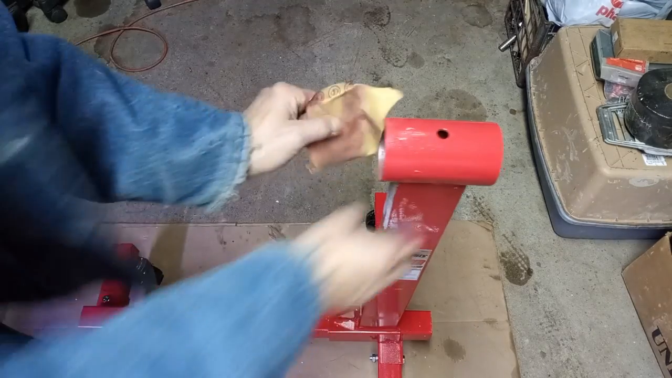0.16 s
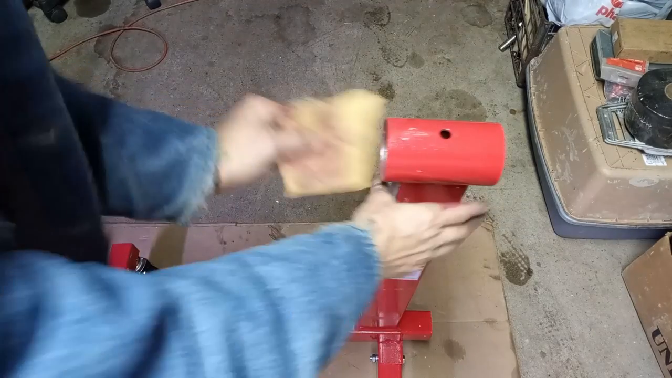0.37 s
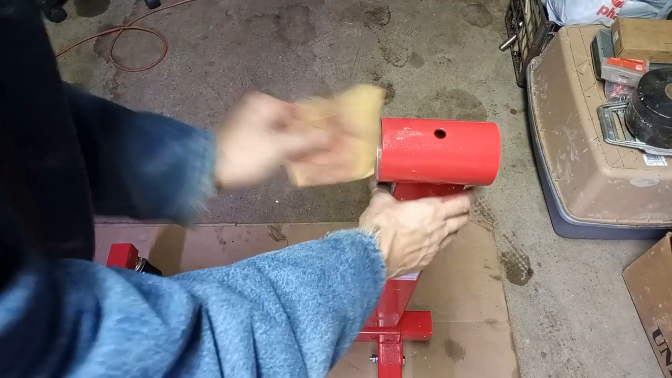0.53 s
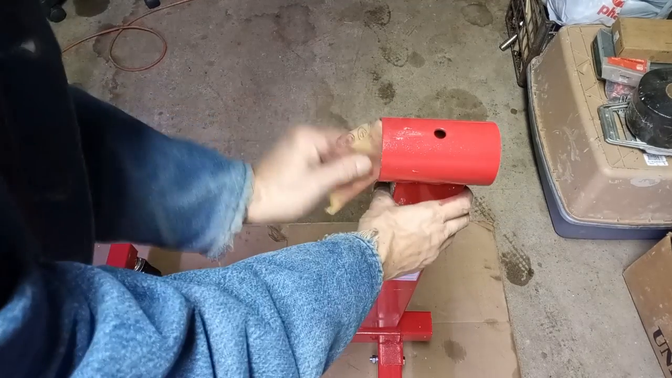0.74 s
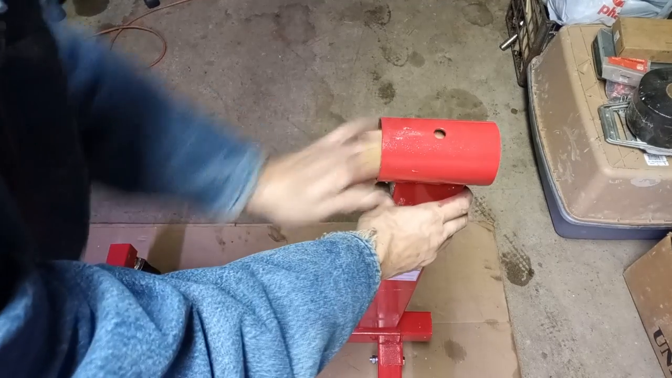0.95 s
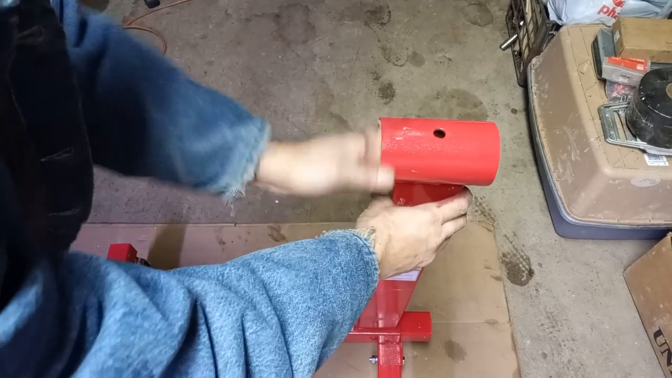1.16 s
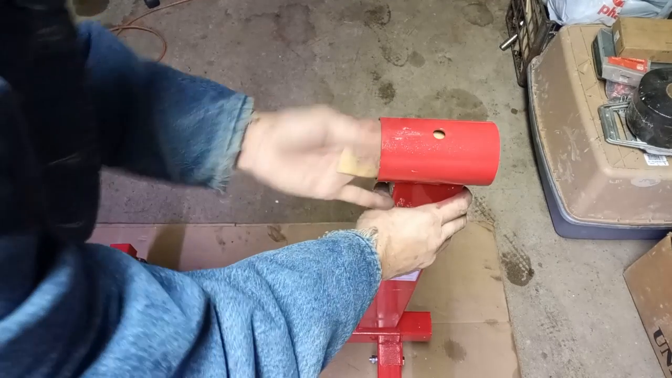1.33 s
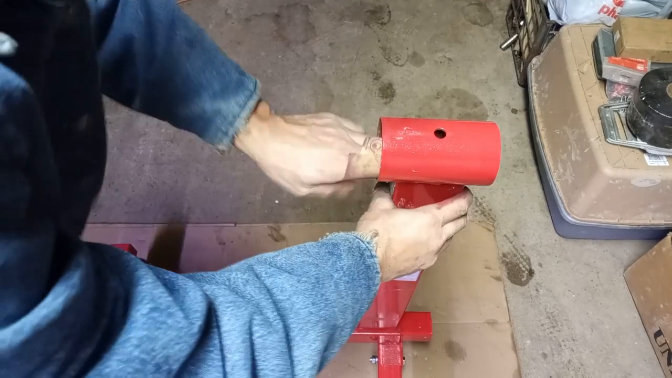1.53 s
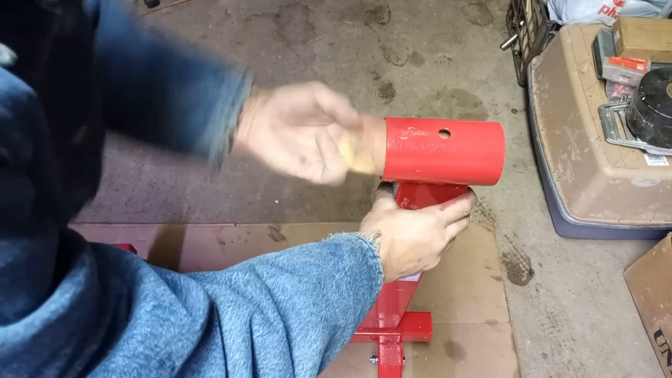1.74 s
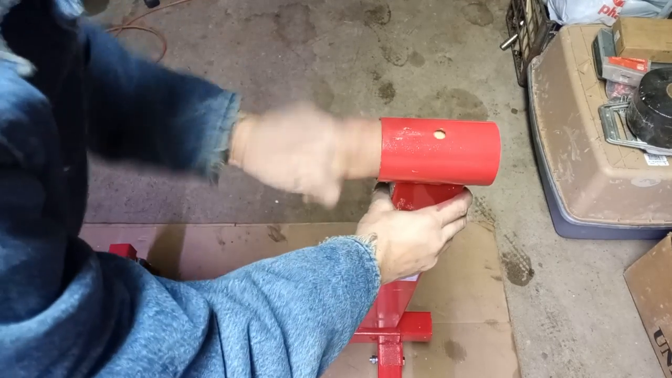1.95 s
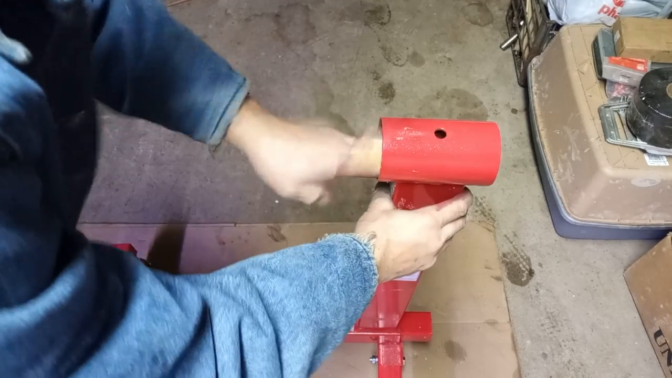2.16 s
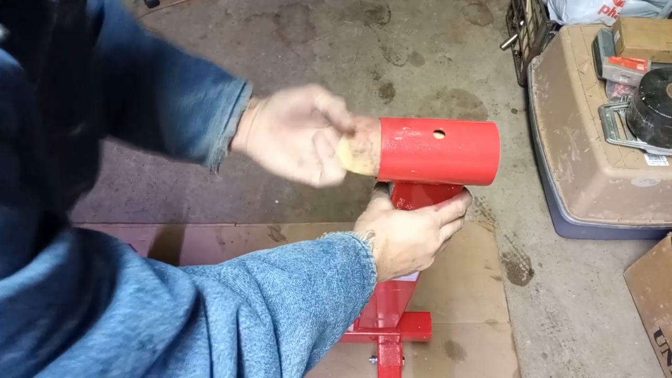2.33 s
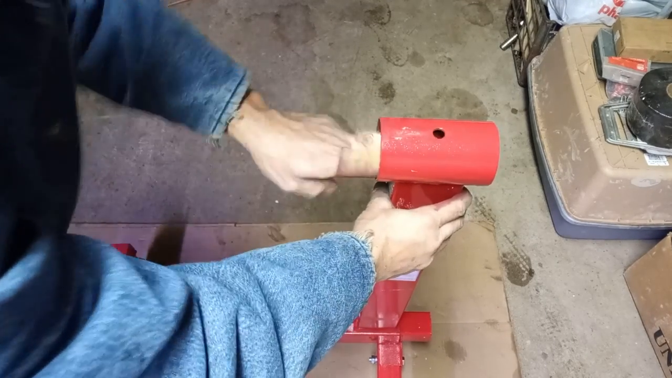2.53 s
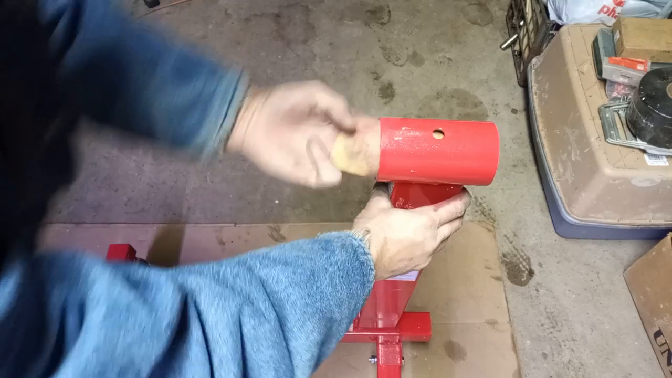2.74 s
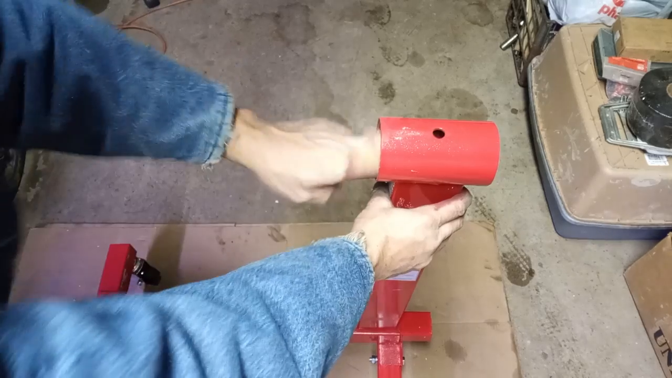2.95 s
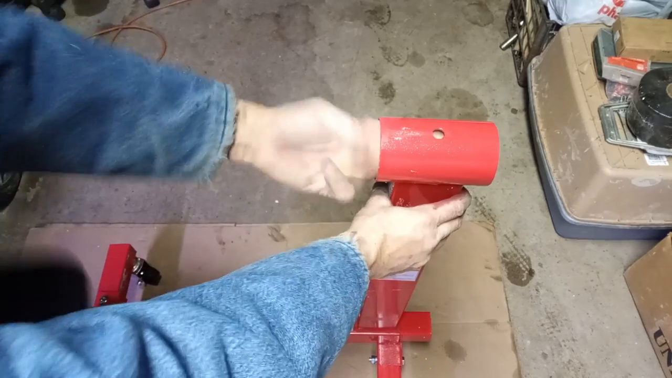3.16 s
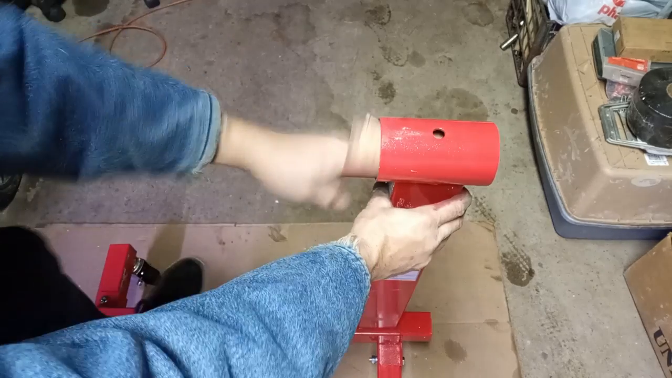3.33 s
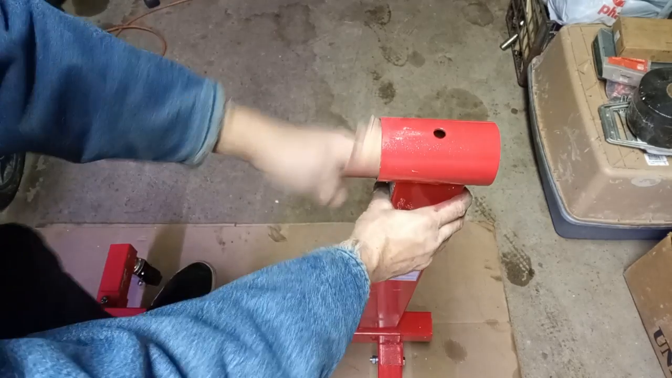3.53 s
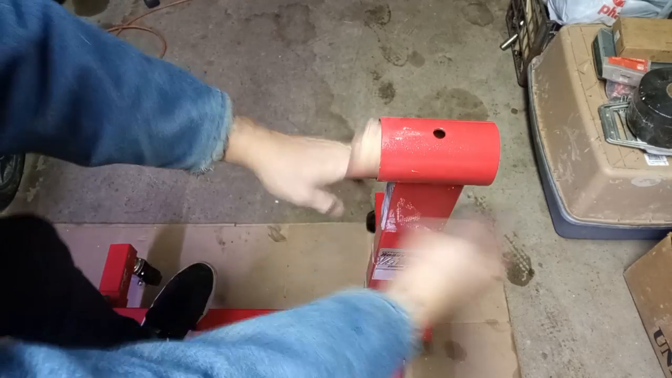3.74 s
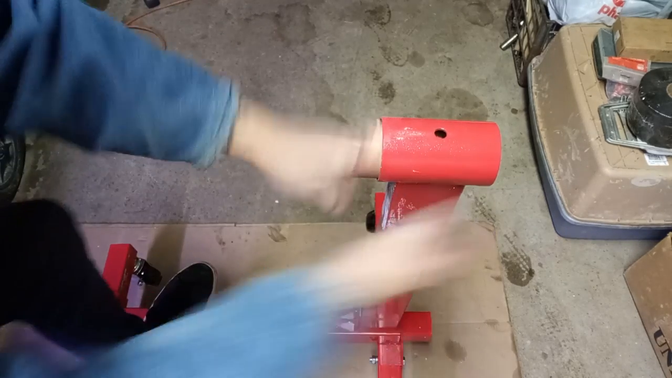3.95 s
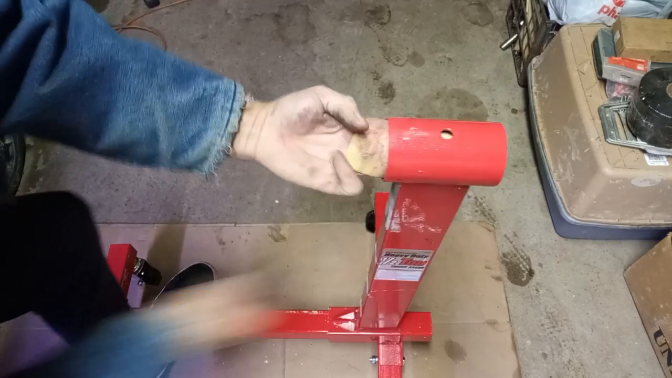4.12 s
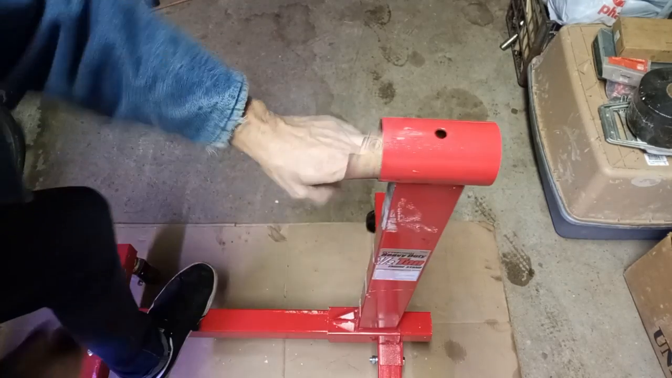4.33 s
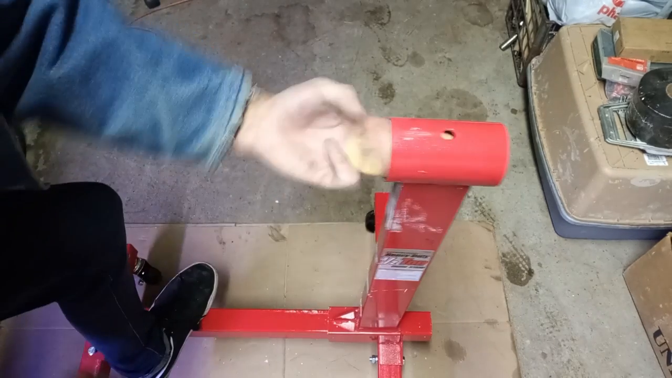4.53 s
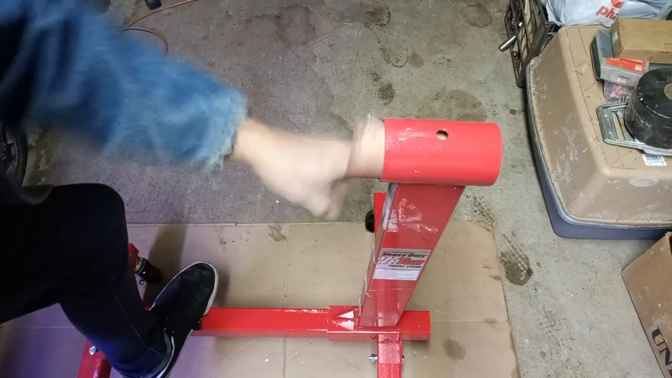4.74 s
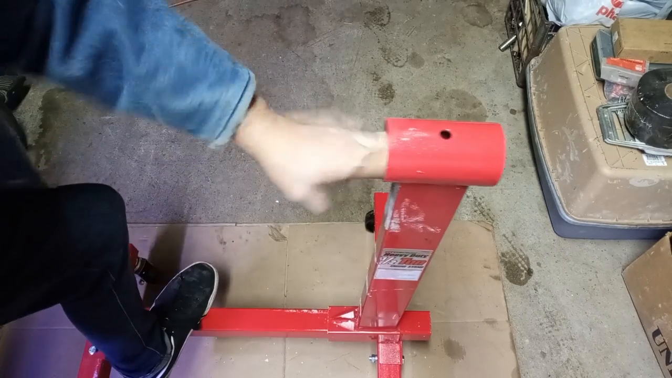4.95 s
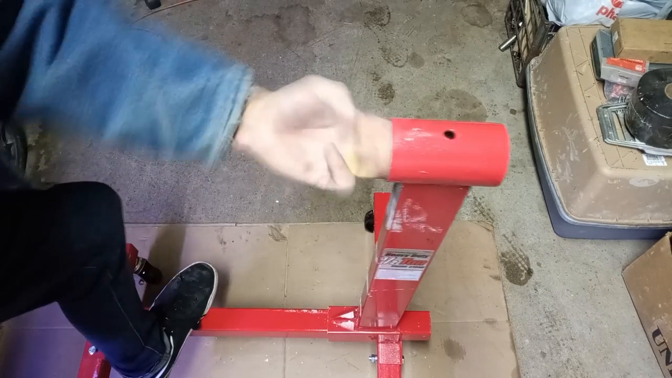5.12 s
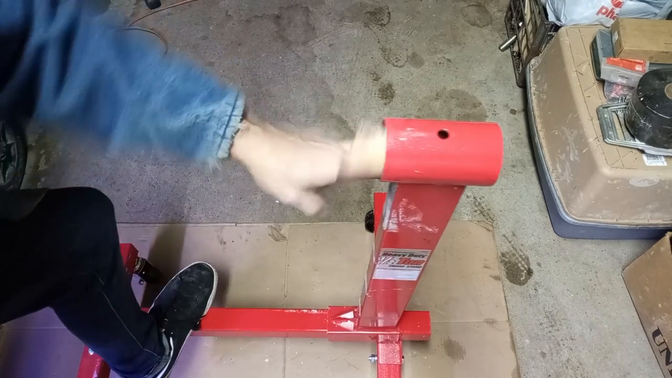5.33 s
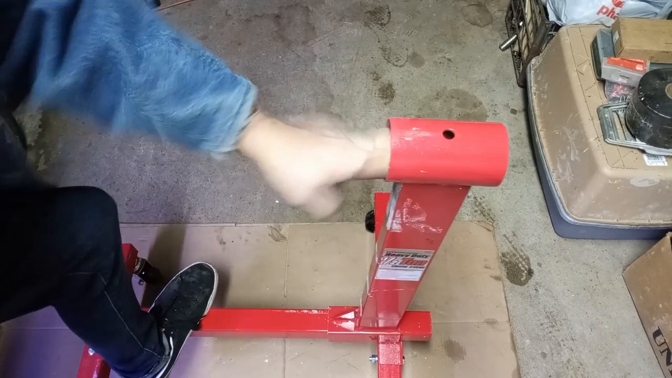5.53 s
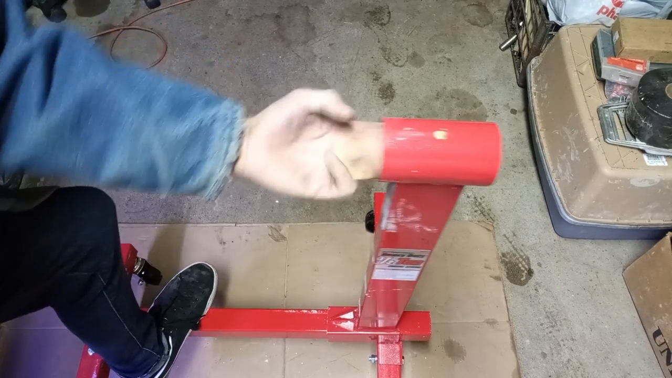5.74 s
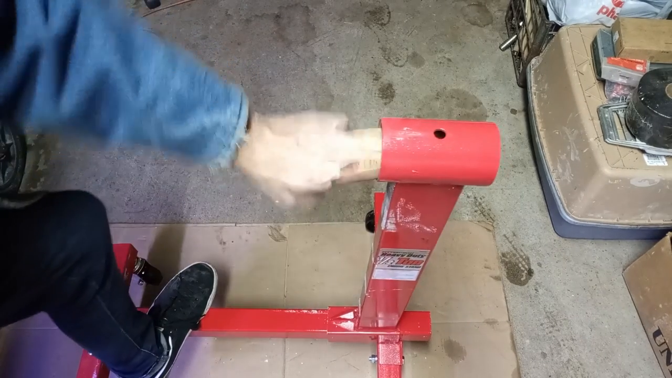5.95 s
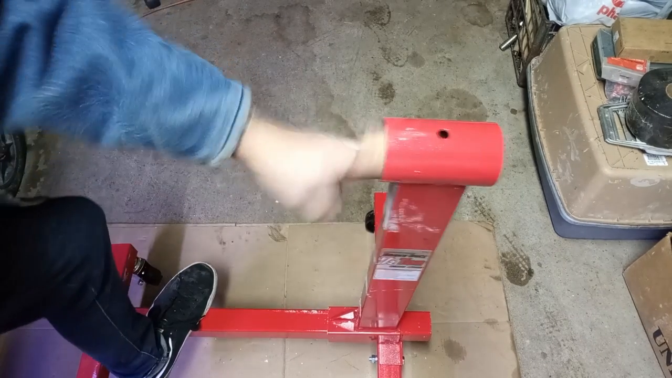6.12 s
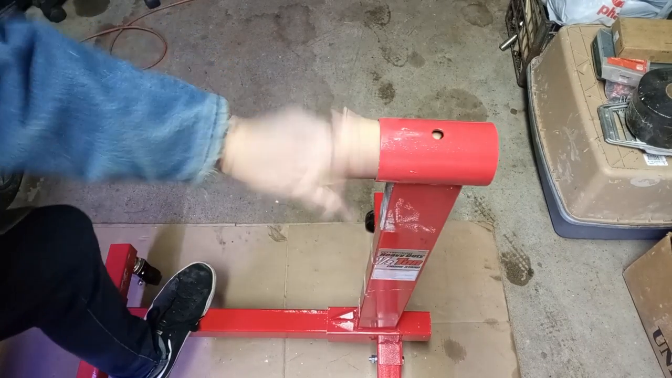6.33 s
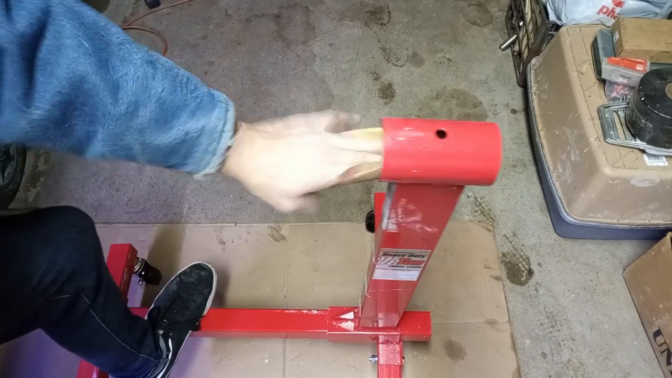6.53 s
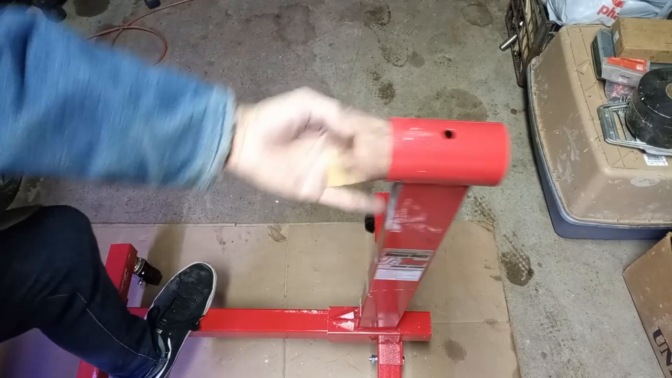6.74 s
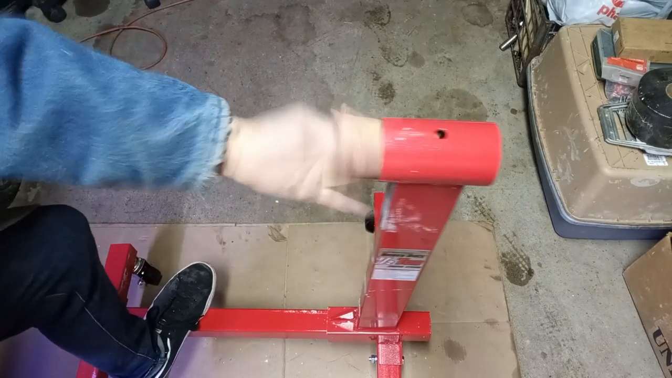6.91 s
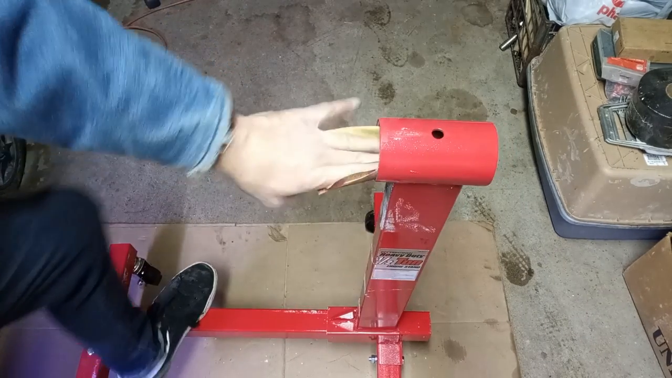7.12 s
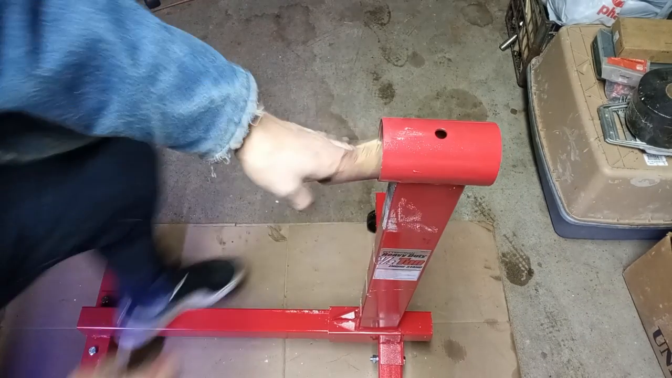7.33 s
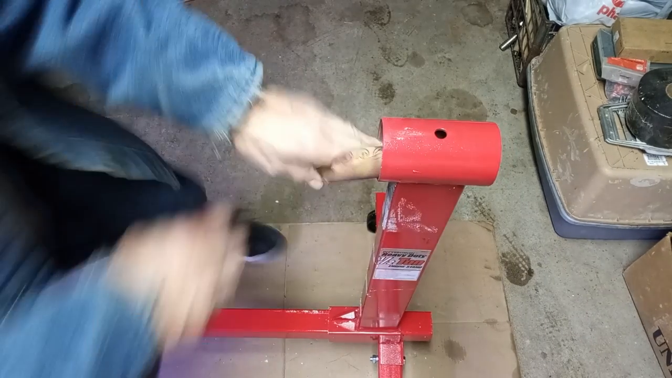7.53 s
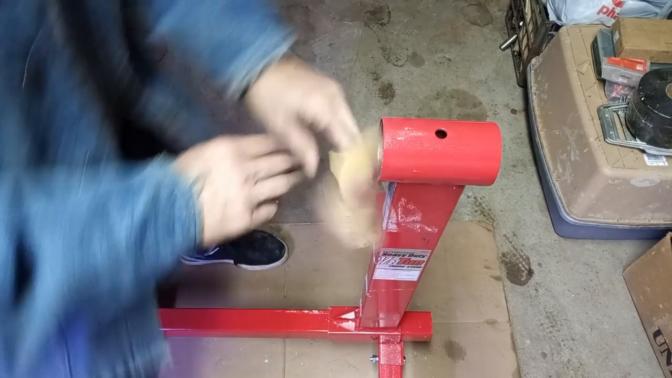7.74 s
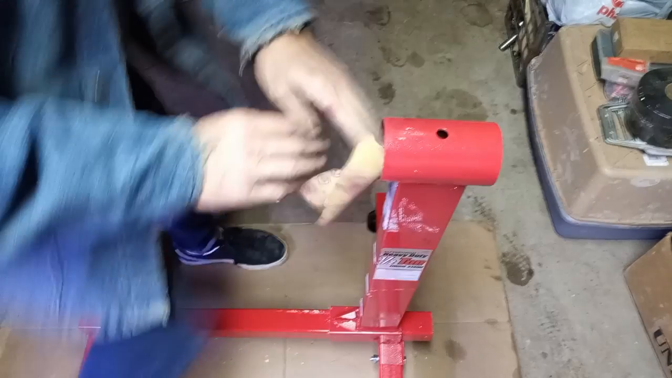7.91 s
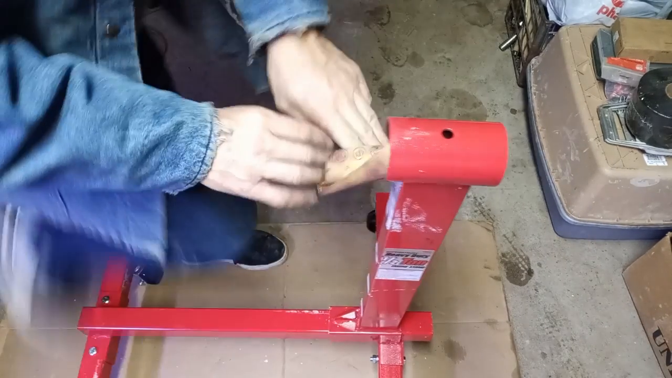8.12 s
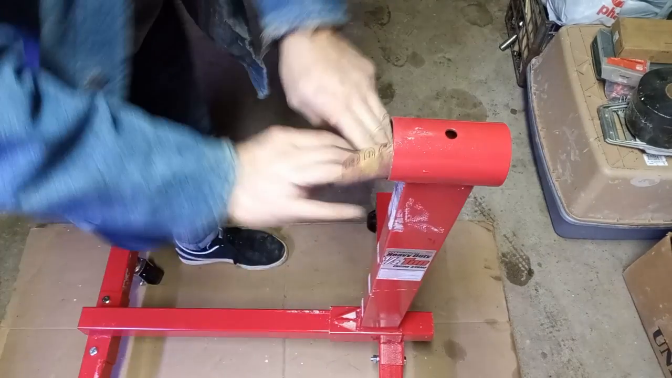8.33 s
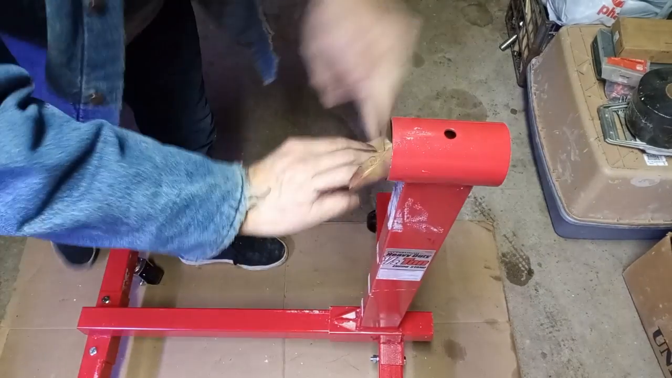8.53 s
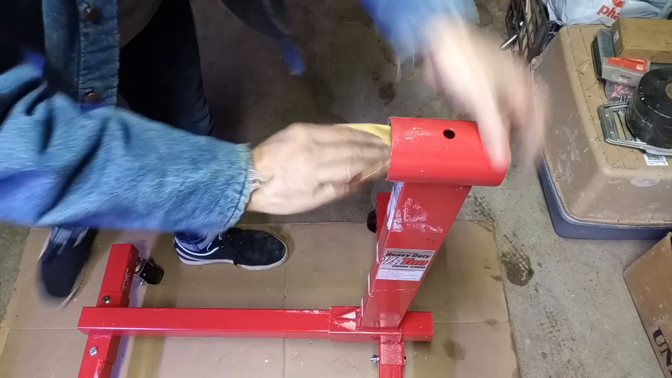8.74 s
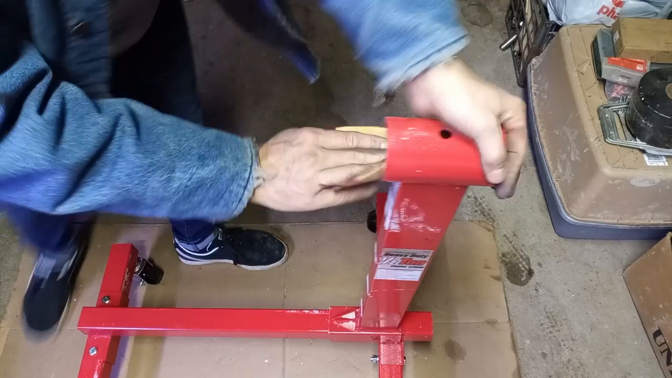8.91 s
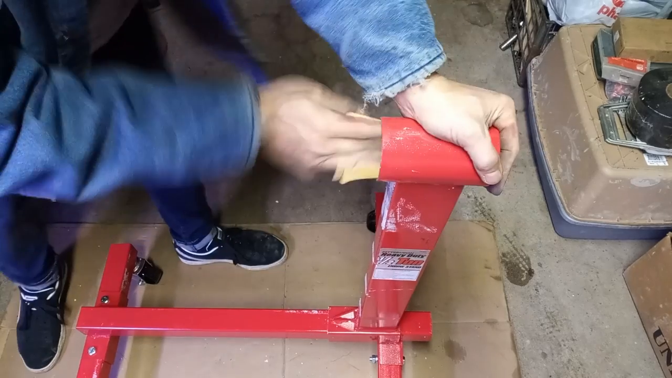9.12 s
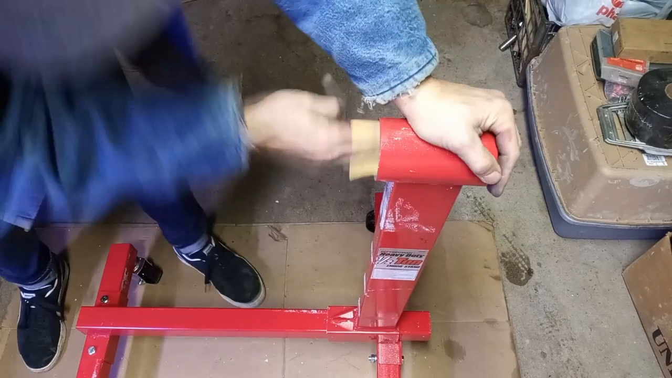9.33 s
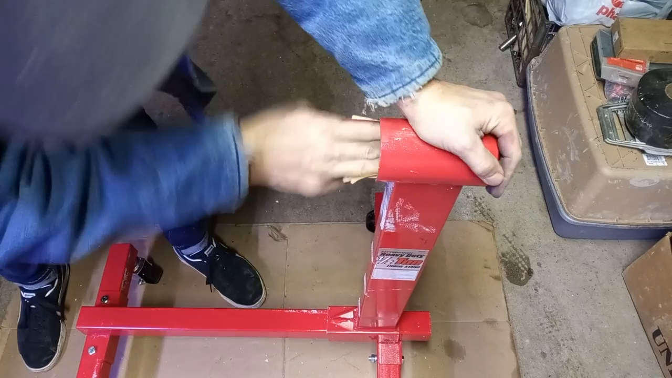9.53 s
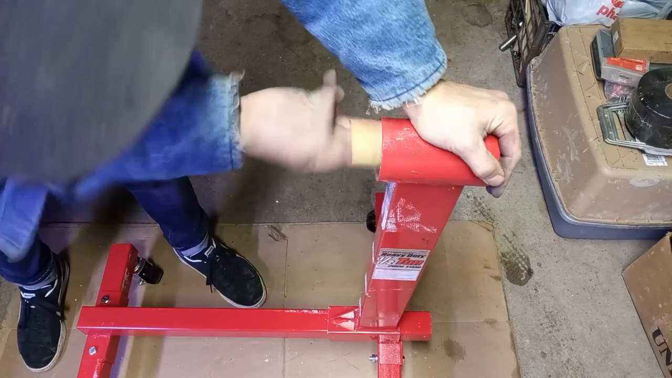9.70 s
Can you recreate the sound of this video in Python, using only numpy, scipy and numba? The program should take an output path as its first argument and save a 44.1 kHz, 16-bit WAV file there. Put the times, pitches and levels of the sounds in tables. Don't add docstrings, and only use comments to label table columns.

```python
import sys
import numpy as np
from scipy import signal
from scipy.fft import rfft, irfft, next_fast_len
from scipy.io import wavfile
from scipy.ndimage import uniform_filter1d
from numba import njit

SR = 44100
rng = np.random.default_rng(int(sys.argv[2]) if len(sys.argv) > 2 else 0)


def voltage_ratio(decibels):
    exponent = np.asarray(decibels, float) / 20
    return 10 ** exponent


def unload_audio(sound):
    columns = np.transpose(np.atleast_2d(sound))
    steps = np.round(np.clip(columns, -1, 1) * 32767)
    wavfile.write(sys.argv[1], SR, steps.astype(np.int16))


N = 435266

# frequency [Hz], density [dB per Hz].
AIR_SPECTRUM = [(18, -80), (30, -31), (118, -11), (437, -4), (1250, -2.5), (4080, -12), (6550, -40),
                (8080, -23), (16000, -28)]
AIR_DB = -56.5
GARAGE_T60_S, GARAGE_DB = 0.069, -12.5

# frequency [Hz], width [Hz], level [dB].
FRAME_MODES = [(82.6, 19, -7), (115, 12, -4.5), (160, 35, -6.5), (196.6, 23, -2.5), (254, 100, -8),
               (35, 47, -18)]
# frequency [Hz], width [Hz], level [dB].
RUSTLE_BANDS = [(308, 48, -4.5), (422, 97, -1.5), (569, 326, 0.5), (730, 503, 0)]
# time [s], frame drumming [dB], sleeve and floor rustle [dB].
JOLTS = [(.02, -50.5, -57), (.08, -60, -47), (.33, -58, -64), (.58, -47, -52), (.88, -61, -48),
         (1.04, -53, -67), (1.59, -56, -54.5), (1.84, -60, -55.5), (2.03, -67, -54), (2.33, -64, -59),
         (2.53, -59.5, -52), (2.94, -60.5, -52), (3.19, -57, -54), (3.41, -57, -52), (3.71, -64, -58),
         (3.82, -61, -51), (4.09, -65, -57), (4.29, -63.5, -54), (4.56, -64, -52.5), (4.89, -67, -55),
         (5.45, -70, -58), (5.66, -60, -55), (6.25, -69, -55.5), (6.79, -60, -53), (7.06, -60.5, -60),
         (7.59, -59, -52.5), (8.66, -62.5, -56), (9.07, -66, -68), (9.26, -70, -53.5), (9.73, -64, -52.5)]
JOLT_RISE_S, FRAME_FALL_S, RUSTLE_FALL_S = 0.094, 0.15, 0.12
# time [s], frame level [dB], rustle level [dB].
CALM = [(0, -68, -59), (.3, -53, -64), (.5, -66, -77), (.75, -55, -51.5), (1, -63.5, -61.5),
        (1.5, -62, -64), (2.5, -68.5, -62.5), (4, -68.5, -61), (5.2, -72.5, -61), (7, -73.5, -59),
        (7.7, -72, -63), (8.3, -76, -63), (9, -72, -60.5), (9.2, -77, -76), (9.87, -78, -82)]
# start [s], pitch [Hz], level [dB], length [s].
HUMS = [(0.09, 202, -52, 0.23), (0.248, 118.3, -53.5, 0.2), (0.073, 330, -65, 0.044),
        (0.566, 116, -65, 0.11), (0.615, 78, -58, 0.16), (1.003, 124, -55, 0.11), (1.416, 203, -67, 0.23),
        (1.817, 201.5, -61, 0.28), (2.49, 122, -66, 0.067), (2.81, 80, -60, 0.091), (3.13, 77.5, -57, 0.18)]

# time [s], level [dB], opening [s], closing [s].
GAP_OPENINGS = [(.55, -46, 0.0087, 0.018), (.75, -57, .1, .1), (1.17, -40.5, .12, 0.091),
                (1.63, -49, 0.047, .1), (2.2, -53, 0.081, .1), (2.62, -46, 0.041, 0.092),
                (2.85, -50, 0.11, 0.17), (3.08, -44, .07, 0.11), (3.3, -52, 0.059, 0.12),
                (3.53, -44, .05, 0.061), (3.98, -47, 0.048, .06), (4.47, -51, .08, .05),
                (6.3, -44, .02, 0.031)]
GAP_HZ, GAP_WIDTH_HZ = 1536, 166
# frequency [Hz], width [Hz], level [dB].
BORE_MODES = [(1032, 264, 7.5), (1037.5, 72, 1)]
# time [s], pitch factor [ratio].
BORE_TUNING = [(0, 1.025), (8.1, 1.015), (8.25, 0.86), (8.6, 0.94), (8.75, 0.95), (9.05, 0.78),
               (9.87, 0.79)]
# time [s], air column level [dB], opening [s], closing [s].
MOUTH_OPENINGS = [(.05, -52, 0.017, 0.09), (.64, -34.5, 0.053, 0.22), (.71, -32, 0.075, 0.035),
                  (.772, -28.5, 0.022, 0.041), (.86, -36, 0.074, 0.13), (.95, -35, 0.1, 0.055),
                  (1.29, -46.5, 0.21, 0.066), (1.48, -43.5, 0.14, 0.085), (2.5, -41, 0.08, 0.023),
                  (2.94, -44.5, 0.069, 0.097), (3.82, -39, 0.14, 0.058), (4.29, -41, 0.093, 0.11),
                  (4.78, -38.5, 0.06, 0.059), (5.39, -42, 0.34, .06), (5.775, -39, 0.027, 0.029),
                  (6.185, -44.5, .04, 0.036), (6.72, -46, .1, 0.051), (7.565, -40, 0.0062, 0.022),
                  (7.94, -46, .02, .1), (8.44, -45.5, 0.025, 0.049), (8.58, -45, 0.077, 0.32),
                  (8.675, -38.5, .02, 0.019), (8.77, -43.5, 0.023, 0.2), (9.05, -48.5, .15, .12)]
# time [s], level over the scrub [dB].
COVERED_MOUTH = [(0, -13), (2, -22), (4, -24), (5, -22), (7, -18.5), (8, -15.5), (9, -23), (9.87, -27)]

# time [s], peak [dB], dull knock over peak [dB], contact [ms].
TICKS = [
    (0.0549, -10.5, -26, 0.15),
    (0.068, -20.5, -9, 0.45),
    (0.55, -19, -22, 0.11),
    (0.587, -29, -13, 0.13),
    (0.773, -18, -21, 0.13),
    (7.56, -33, -5, 0.2),
    (7.732, -23, -24, 0.14),
    (8.628, -31, -23, 0.074),
    (8.754, -15, -21, 0.14),
]
# frequency [Hz], gain [dB].
CRACK_SPECTRUM = [(120, -49), (500, -11), (2000, -3.5), (6450, -2), (8300, -20.5), (15000, -3)]
# time [s], peak [dB].
FLICKS = [(.028, -36), (.109, -25), (.188, -20), (.203, -32), (.257, -30), (.265, -35), (7.638, -21.5),
          (7.692, -20), (8.636, -24), (7.93, -31), (7.971, -26), (8.545, -30), (8.72, -33), (8.7523, -26),
          (8.768, -23)]

# frequency [Hz], density [dB per Hz].
SCRATCH_SPECTRUM = [(400, -43.5), (800, -25.5), (1300, -18.5), (2100, -10.5), (3050, -11.5), (4000, -9),
                    (5600, -5.5), (6450, 4), (8300, -16.5), (10100, -8.5), (13300, -19.5), (14100, -17),
                    (14700, -7.5), (16000, -8.5)]
# frequency [Hz], width [Hz], level [dB].
WALL_MODES = [(3270, 55, -25), (3850, 260, 8), (3970, 190, 0.5), (4395, 350, 5.5), (5640, 900, 8.5)]
# bite [s], rise [ms], scrub level [dB], hold [s], finger pocket over scrub [dB].
AWAY = [(1.065, 52, -28.5, 0.2, -9), (1.588, 35, -28, 0.17, -8.5), (2.088, 26, -28.5, 0.18, -5),
        (2.561, 40, -28.5, 0.12, -6), (3.011, 39, -28, 0.13, -7.5), (3.475, 37, -28.5, 0.096, -9.5),
        (3.899, 28, -28.5, 0.13, -8.5), (4.35, 29, -28.5, 0.14, -14), (4.879, 45, -29, 0.2, -8.5),
        (5.471, 42, -28.5, 0.18, -11.5), (6.006, 56, -28.5, .16, -9), (6.549, 46, -28, 0.14, -13.5),
        (7.053, 30, -30.5, 0.11, -11.5), (9.061, 47, -29, .15, -10.5), (9.538, 13, -29, .11, -10.5)]
# bite [s], rise [ms], scrub level [dB], hold [s], finger pocket over scrub [dB].
BACK = [(1.355, 25, -29.5, 0.14, -12), (1.854, 20, -28.5, 0.16, -9), (2.349, 19, -29.5, .14, -9),
        (2.786, 25, -29.5, 0.15, -12.5), (3.252, 19, -29.5, 0.14, -9.5), (3.68, 11, -31.5, .12, -11.5),
        (4.14, 36, -30, 0.15, -15.5), (4.615, 10.5, -30, 0.17, -24), (5.189, 28, -29, 0.18, -13),
        (5.751, 45, -30, 0.19, -13), (6.284, 33, -30, 0.17, -11), (6.785, 28, -29.5, 0.16, -11),
        (9.311, 8.7, -29.5, 0.15, -12), (9.782, 8.8, -29, 0.08, -11.5)]
# bite [s], rise [ms], scrub level [dB], hold [s], finger pocket over scrub [dB].
FUMBLES = [(0.186, 3, -37, .01, -24), (0.208, 20, -46, 0.064, -24), (0.531, 21, -37.5, 0.022, -16),
           (0.6, 30, -34.5, 0.1, -11), (0.688, 23, -32, 0.027, -12), (0.728, 25, -34.5, 0.1, -8.5),
           (0.826, 38, -30.5, 0.18, -8.5), (7.231, 17, -37.5, 0.06, -11.5), (7.29, 17, -42, .06, -14),
           (7.547, 8, -41.5, 0.039, -27), (7.625, 5, -43, .015, -20), (7.633, 20, -33.5, 0.053, -21),
           (7.7, 10, -45, 0.034, -21), (7.777, 38, -39, 0.056, -15), (7.912, 20, -38.5, 0.039, -10),
           (7.957, 8, -36, 0.02, -21), (7.993, 13, -38.5, .03, -24), (8.083, 29, -39.5, 0.053, -20),
           (8.404, 27, -39.5, 0.068, -18), (8.54, 8, -38, 0.034, -9), (8.61, 14, -34.5, 0.036, -26),
           (8.657, 10, -44, .02, -20), (8.7513, 1.4, -30, 0.017, -19), (8.787, 10, -43.5, .1, -10.5),
           (8.974, 63, -31.5, 0.1, -8), (9.692, 23, -36, 0.052, -5.5)]
SAG_DB_PER_S, EASE_DB_PER_S, LIFT_DB_PER_S = 16, 146, 336
STALL_DB_PER_S2, BITE_POWER = 255, 0.69
# time [s], level [dB].
RESTING = [(0, -49), (.17, -49), (.37, -59.5), (.52, -55.5), (.62, -44), (1, -41), (3, -41.5), (3.5, -45),
           (7.2, -45.5), (7.36, -45), (7.42, -47), (7.52, -42.5), (7.61, -47.5), (7.77, -46.5), (7.89, -47),
           (8.08, -51), (8.16, -45), (8.3, -44), (8.4, -43), (8.53, -44.5), (8.69, -42), (8.745, -44),
           (8.8, -40.5), (8.95, -42), (9.2, -47)]
# time [s], first pocket resonance [Hz], second resonance [Hz], second over first [dB].
REACH = [(0.187, 1510, 2540, 2), (0.528, 1520, 2970, -1), (0.595, 1450, 2800, 9), (0.72, 1570, 2540, 8),
         (0.836, 1970, 2670, -10), (1.065, 2160, 2400, 8), (1.2, 2070, 2420, -4), (1.355, 1550, 2830, 4),
         (1.591, 1900, 2520, -5), (1.7, 1910, 2520, 6), (1.854, 1800, 2900, 2.5), (2.09, 1840, 2840, 3),
         (2.349, 1870, 2630, -2), (2.557, 1840, 2580, 0), (2.786, 1720, 2650, 1), (3.012, 1800, 2600, 0),
         (3.252, 1650, 2710, 3), (3.477, 1760, 2610, 7), (3.68, 2170, 2490, 10.5), (3.9, 1790, 2440, 0.5),
         (4.14, 1550, 2580, 10), (4.354, 1970, 2500, 6), (4.615, 2260, 2600, 11), (4.883, 2010, 2690, 2),
         (5.02, 1920, 2560, 1), (5.189, 2110, 2760, 8), (5.472, 2130, 2620, -1), (5.6, 2130, 2330, 5),
         (5.751, 1930, 2400, 9), (5.81, 2080, 2510, 8), (6.006, 2050, 2530, 2.5), (6.13, 1950, 2600, 5),
         (6.284, 2040, 2660, 6.5), (6.545, 2060, 2600, 6), (6.785, 2050, 2700, 10.5), (7.05, 1990, 2800, 6),
         (7.237, 2050, 2580, 11.5), (7.629, 1790, 2660, 6), (7.901, 1920, 3000, 9), (8.085, 2240, 2800, 14),
         (8.36, 2070, 2670, 16), (8.534, 1680, 2450, 5), (8.75, 1930, 2350, -1), (8.82, 2000, 2610, 12),
         (8.9, 2100, 2700, 14.5), (8.976, 1990, 2800, 2), (9.08, 1750, 2330, -15), (9.311, 1850, 2330, 2.5),
         (9.535, 1930, 2440, 5), (9.783, 2240, 2360, 8.5)]
# time [s], snap peak [dB], pocket flare [dB], held back [dB].
CATCHES = [(1.3613, -16, -2, -5), (1.608, -24, 4, -4.5), (1.8667, -17, 7, 0), (2.1091, -20, -5.5, -4.5),
           (2.354, -25, 16, 1), (2.794, -19, 12, 2), (3.029, -19, 6, -3), (3.262, -20, 5, -1),
           (3.496, -19, -3, -3.5), (3.6905, -19, 8, -3), (3.9255, -18, -9, -4), (4.154, -19, 11, -2),
           (4.373, -21, 1, -4), (4.6244, -20, 8, 1), (4.897, -23, 4, -6), (5.2021, -22, 12, 0),
           (5.5084, -21, 2, -5.5), (5.7678, -24, 20, 1), (6.059, -17, 12.5, 0), (6.3075, -22, 13, -3),
           (6.5894, -9, 8, -1), (6.799, -17, 10, -1), (7.0787, -14, 2, -2), (7.2504, -26, 4, -3),
           (9.322, -19, 1, -1), (9.5447, -17, -12, 2), (9.794, -16, 7, -2.5)]
STICK_S, SLIP_DB, SLIP_S, FLARE_S, SNAP_DB = 0.023, 0, 0.0084, 0.012, -7

GATE_HZ, GATE_FROM_DB, GATE_DB_PER_DB = 820, -27, 0.77
TOP_HZ = 15760


def level(x, db):
    return x * voltage_ratio(db) / np.sqrt(np.mean(x ** 2))


def curves(table):
    s, *columns = np.transpose(table)
    return [np.interp(np.arange(N) / SR, s, column) for column in columns]


def steps(table):
    rows = np.array(table, float)
    current = np.maximum(np.searchsorted(rows[:, 0], np.arange(N) / SR) - 1, 0)
    return uniform_filter1d(rows[current, 1:], size=600, axis=0).T


def swells(s, db, rise_s, fall_s, floor_db):
    coarse = np.arange(0, N, 64)
    after = coarse / SR - np.reshape(s, (-1, 1))
    rise_s, fall_s, db = (np.reshape(v, (-1, 1)) for v in (rise_s, fall_s, db))
    top_db = np.max(db - 15 * np.maximum(-after / rise_s, after / fall_s), axis=0)
    return np.maximum(np.interp(np.arange(N), coarse, top_db), floor_db)


def walk(rate):
    hold = int(SR / rate)
    held = np.repeat(rng.standard_normal(N // hold + 1), hold)
    return 1.57 * uniform_filter1d(uniform_filter1d(held, hold), hold)[:N]


def colour(x, points):
    hz, db = np.transpose(points)
    bins = np.maximum(np.fft.rfftfreq(2048, 1 / SR), 1)
    log_gain = np.interp(np.log(bins), np.log(hz), db) * np.log(10) / 20
    cepstrum = irfft(log_gain)
    cepstrum[1:1024] *= 2
    cepstrum[1025:] = 0
    impulse = irfft(np.exp(rfft(cepstrum)))[:1024]
    return signal.fftconvolve(x, impulse)[:N]


def butter(x, order, hz, kind="low"):
    return signal.sosfilt(signal.butter(order, hz, kind, fs=SR, output="sos"), x)


@njit
def svf(x, hz, width):
    y, band, low = np.empty(len(x)), 0., 0.
    for i in range(len(x)):
        g, k = np.tan(np.pi * hz[i] / SR), width / hz[i]
        v = (band + g * (x[i] - low)) / (1 + g * (g + k))
        band, low, y[i] = 2 * v - band, low + 2 * g * v, k * v
    return y


def steep(x, hz, width):
    return level(svf(svf(x, hz, width), hz, 2.5 * width), 0)


def ring(x, modes, drift, flicker_db):
    total = 0
    for k, (hz, width, db) in enumerate(modes):
        gain = voltage_ratio(db + flicker_db * walk(9))
        mode = svf(x, hz * (1 + drift * walk(5)), 1. * width)
        total = total + (-1) ** k * gain * mode
    return level(total, 0)


def grit(per_s, spread_db):
    caught = rng.random(N) < per_s / SR
    size = rng.standard_normal(N) * voltage_ratio(spread_db * rng.exponential(size=N))
    return level(caught * size, 0)


def judder():
    tremble_db = 0.7 * walk(45) + 0.8 * walk(160)
    return grit(per_s=16000, spread_db=-0.07) * voltage_ratio(tremble_db)


def catches(before_s, after_s, before, after):
    s, t = np.transpose(CATCHES)[0], np.arange(N) / SR
    k = np.searchsorted(s, t)
    ahead, last = np.minimum(k, len(s) - 1), np.maximum(k - 1, 0)
    before, after = before + 0 * s, after + 0 * s
    build = (k < len(s)) * before[ahead] * np.exp(-np.abs(s[ahead] - t) / before_s)
    decay = (k > 0) * after[last] * np.exp(-np.abs(t - s[last]) / after_s)
    return build + decay


def scrub():
    power, t = voltage_ratio(2 * curves(RESTING)[0]), np.arange(int(0.6 * SR)) / SR
    for ease, strokes in [(EASE_DB_PER_S, AWAY + BACK), (LIFT_DB_PER_S, FUMBLES)]:
        for s, rise_ms, db, hold_s, _ in strokes:
            easing = np.maximum(t - hold_s, 0)
            sag_db = SAG_DB_PER_S * np.maximum(t - rise_ms / 1000, 0)
            lost_db = sag_db + ease * easing + STALL_DB_PER_S2 * easing ** 2
            bite = np.minimum(1000 * t / rise_ms, 1) ** BITE_POWER
            i = int(s * SR)
            power[i:i + len(t)] += ((bite * voltage_ratio(db - lost_db)) ** 2)[:N - i]
    held_back_db = np.minimum(np.transpose(CATCHES)[3], 0)
    power = power * voltage_ratio(2 * catches(STICK_S, SLIP_S, held_back_db, SLIP_DB))
    return np.sqrt(power), 10 * np.log10(power)


def loudness():
    return uniform_filter1d(np.maximum(scrub()[1] + 42, 0), size=2000)


def air():
    swell_db = 0.8 * walk(6)
    hiss = level(colour(rng.standard_normal(N), AIR_SPECTRUM), AIR_DB)
    return voltage_ratio(swell_db - 0.3 * loudness()) * hiss


def garage(x):
    t = np.arange(int(0.5 * SR)) / SR
    fade = np.exp(-np.log(1000) * t / GARAGE_T60_S) * (t > 0.004)
    turn, out = 2.5 * np.arange(N) / SR + 0.6 * walk(3), 0
    for k in range(4):
        tail = rng.standard_normal(len(t)) * fade
        tail = tail * np.exp(-t / 0.017) + uniform_filter1d(tail, size=3)
        share = np.cos(turn + k * np.pi / 4) / np.sqrt(2)
        out = out + signal.oaconvolve(share * x, tail / np.sqrt(np.sum(tail ** 2)))[:N]
    return voltage_ratio(GARAGE_DB) * out


def stand():
    s, frame_db, rustle_db = np.transpose(JOLTS)
    still_db, hush_db = curves(CALM)
    hush_db = hush_db + 3.5 - 0.16 * loudness()
    frame_db = swells(s, frame_db, JOLT_RISE_S, FRAME_FALL_S, still_db)
    rustle_db = swells(s, rustle_db, JOLT_RISE_S, RUSTLE_FALL_S, hush_db)
    frame = ring(grit(per_s=740, spread_db=0.5), FRAME_MODES, drift=0.017, flicker_db=2.5)
    rustle = ring(grit(per_s=4000, spread_db=1.25), RUSTLE_BANDS, drift=0.081, flicker_db=0.0)
    return voltage_ratio(frame_db) * frame + voltage_ratio(rustle_db + 0.5) * rustle


def hums():
    t, out = np.arange(N) / SR, 0
    for s, hz, db, length_s in HUMS:
        swell = np.sin(np.pi * np.clip((t - s) / length_s, 0, 1))
        size = voltage_ratio(db + 2.0 * walk(24.7))
        phase = 2 * np.pi * np.cumsum(hz * (1 + 0.012 * walk(15.5))) / SR
        out = out + size * swell * np.sin(phase)
    return np.sqrt(2) * out


def gap():
    gap_db = swells(*np.transpose(GAP_OPENINGS), -69.5)
    return voltage_ratio(gap_db) * steep(judder(), GAP_HZ * (1 + 0.01 * walk(11)), 1. * GAP_WIDTH_HZ)


def bore():
    covered_db = scrub()[1] + curves(COVERED_MOUTH)[0]
    bore_db = swells(*np.transpose(MOUTH_OPENINGS), covered_db)
    tuning = curves(BORE_TUNING)[0]
    rub, column = judder(), 0
    for hz, width, db in BORE_MODES:
        column = column + voltage_ratio(db + 1.0 * walk(12)) * steep(rub, hz * tuning, 1. * width)
    return voltage_ratio(bore_db) * level(column, -3.66)


def ticks():
    sharp, knock, t = np.zeros(N + 1024), np.zeros(N), np.arange(1024) / SR
    for s, peak_db, dull_db, contact_ms in TICKS:
        i = int((s + 0.00108) * SR)
        push = np.sin(np.pi * np.clip(1000 * t / max(contact_ms, 0.045), 0, 1)) ** 2
        grains = rng.standard_normal(len(t)) * np.exp(-t / 0.00079)
        rattle = np.convolve(grains, push)[:len(t)]
        sharp[i:i + len(t)] += voltage_ratio(peak_db) * (0.18 * rattle - push)
        knock[i] -= voltage_ratio(peak_db + dull_db)
    thud = svf(svf(knock, np.full(N, 600.), 500.), np.full(N, 450.), 500.)
    return 1.17 * colour(sharp[:N], CRACK_SPECTRUM) + 14 * thud


def flicks():
    out, t = np.zeros(N + 256), np.arange(256) / SR
    snaps = [(s, db + SNAP_DB) for s, db, *_ in CATCHES]
    for s, peak_db in FLICKS + snaps:
        i = int((s + 0.00032) * SR)
        out[i:i + len(t)] += voltage_ratio(peak_db) * rng.standard_normal(len(t)) * np.exp(-t / 0.00034)
    return 1.3 * butter(colour(out[:N], CRACK_SPECTRUM), 2, 3500, "high")


def finger_pocket(rub):
    low_db = steps(sorted(AWAY + BACK + FUMBLES))[-1] - 1.5 + 1.0 * walk(12)
    low_hz, high_hz, tilt_db = steps(REACH)
    high_db = low_db + tilt_db + 0.37 * walk(4.9)
    low = steep(rub, low_hz * (1 + 0.026 * walk(10)), 306.0)
    high = steep(rub, high_hz * (1 + 0.017 * walk(18)), 170.0)
    return voltage_ratio(low_db - 2.0) * low - voltage_ratio(high_db - 9.5) * high


def scratch(scrub_db):
    body = butter(level(colour(judder(), SCRATCH_SPECTRUM), 0), 4, 8200)
    top = butter(judder(), 4, 8200, "high")
    bright_db = 0.31 * (scrub_db + 34) + 0.78 * walk(25)
    direct = body + voltage_ratio(bright_db) * level(colour(top, SCRATCH_SPECTRUM), -6.0)
    depth = np.clip(0.1 + 0.9 * walk(8), 0, 1)
    return direct - depth * svf(direct, 13300 * (1 + 0.006 * walk(4)), 900.)


def sanding():
    gain, scrub_db = scrub()
    direct = scratch(scrub_db)
    wall = ring(judder(), WALL_MODES, drift=0.035, flicker_db=2.5)
    pocket = finger_pocket(judder())
    flare_db = catches(FLARE_S, FLARE_S, 0, np.transpose(CATCHES)[2]) + 0.13 * walk(16)
    rubbing = gain * (direct + level(wall, -11.5) + voltage_ratio(flare_db - 3.0) * pocket)
    return butter(rubbing, 6, 820, "high")


def gate(x):
    low = signal.sosfiltfilt(signal.butter(3, GATE_HZ, fs=SR, output="sos"), x)
    hiss = x - low
    loud_db = 10 * np.log10(np.abs(uniform_filter1d(hiss ** 2, size=2600)) + 1e-12)
    return hiss + low * voltage_ratio(-GATE_DB_PER_DB * np.maximum(loud_db - GATE_FROM_DB, 0))


def scene():
    near = stand() + hums() + gap() + bore() + ticks() + flicks() + sanding()
    return np.array([2 * (near + garage(near) + air()), np.zeros(N)])


def record(dry):
    size = next_fast_len(N)
    hz = np.fft.rfftfreq(size, 1 / SR)
    kept = np.clip((TOP_HZ - hz) / 60, 0, 1)
    bass = 1 / np.sqrt(1 + (55 / (hz + 1)) ** 3.8)
    return irfft(rfft(gate(dry), size) * kept * bass, size)[:, :N]


dry = scene()
out = record(dry)
unload_audio(out)
```